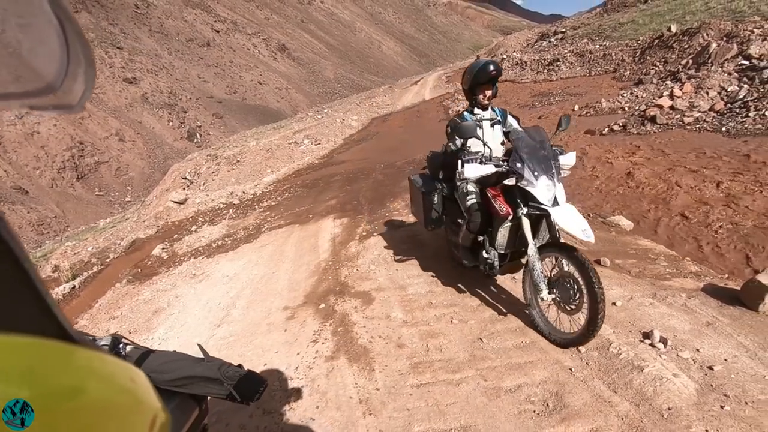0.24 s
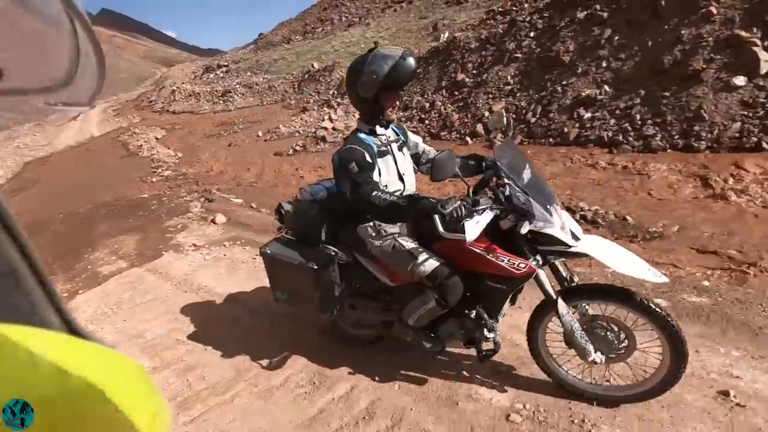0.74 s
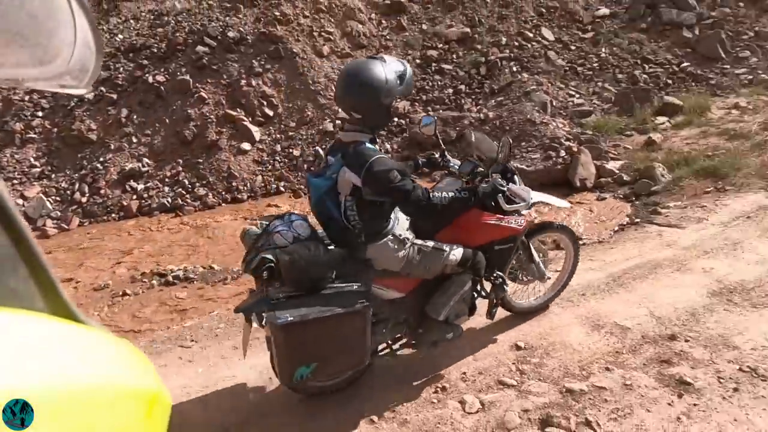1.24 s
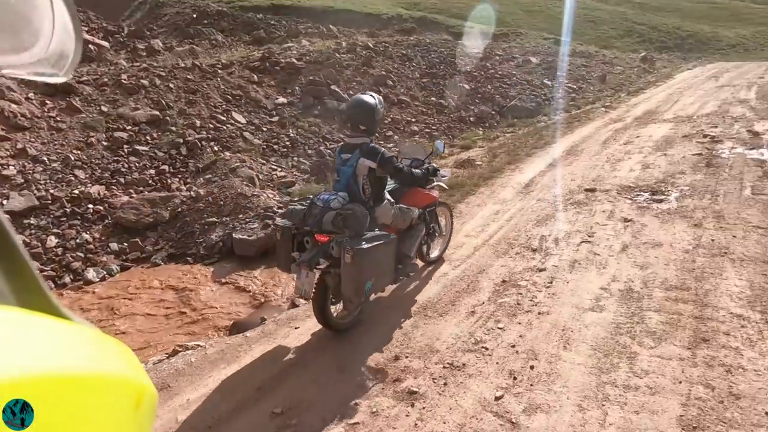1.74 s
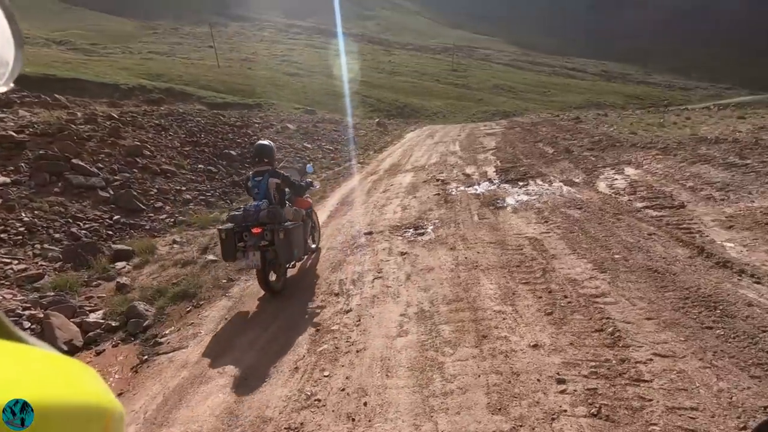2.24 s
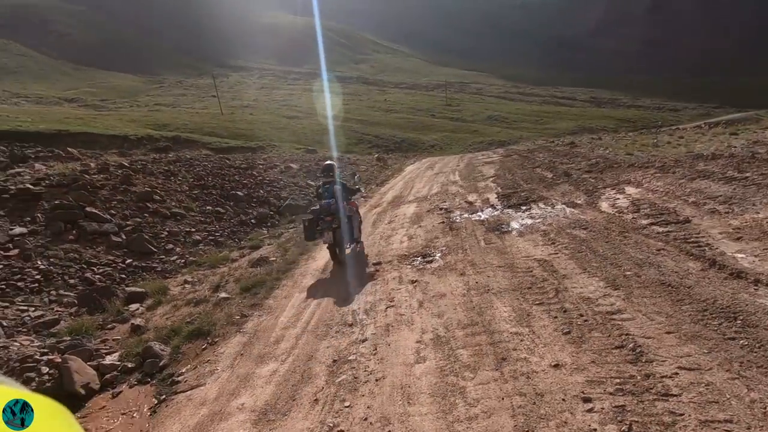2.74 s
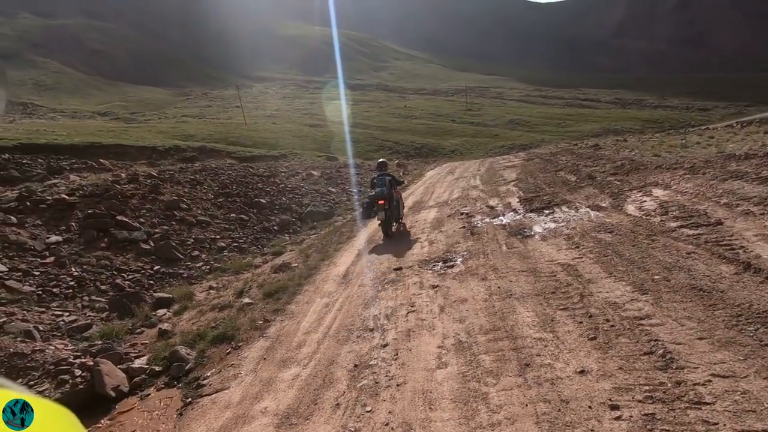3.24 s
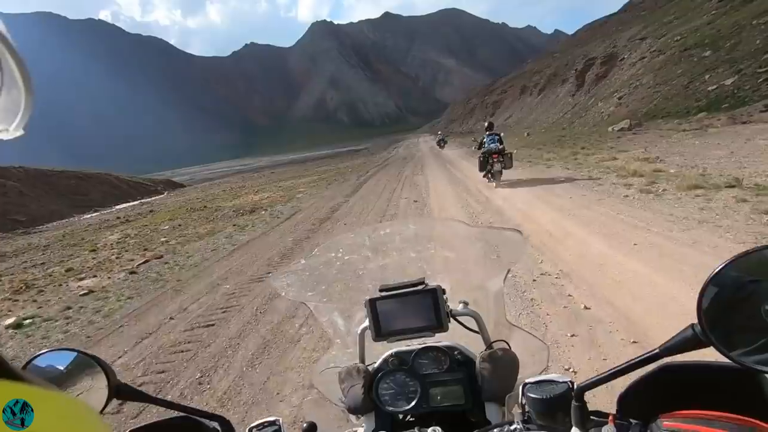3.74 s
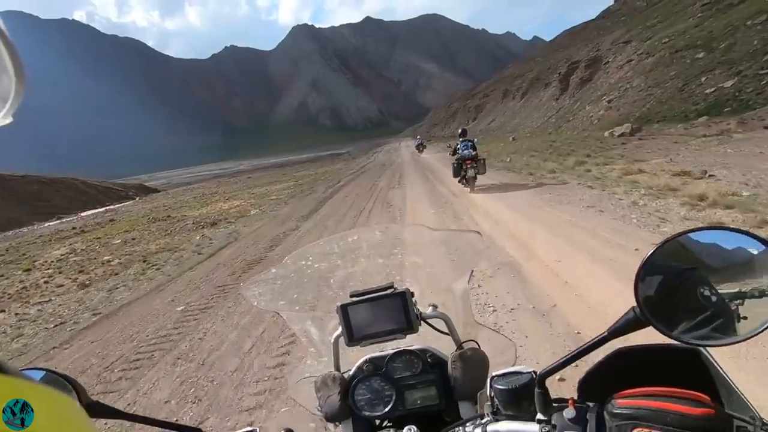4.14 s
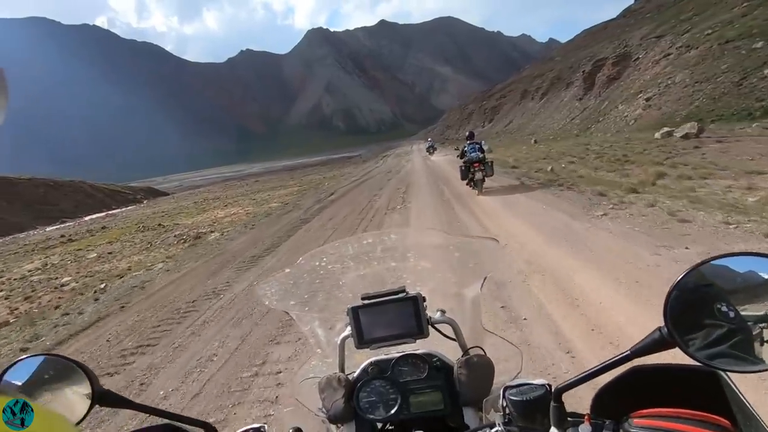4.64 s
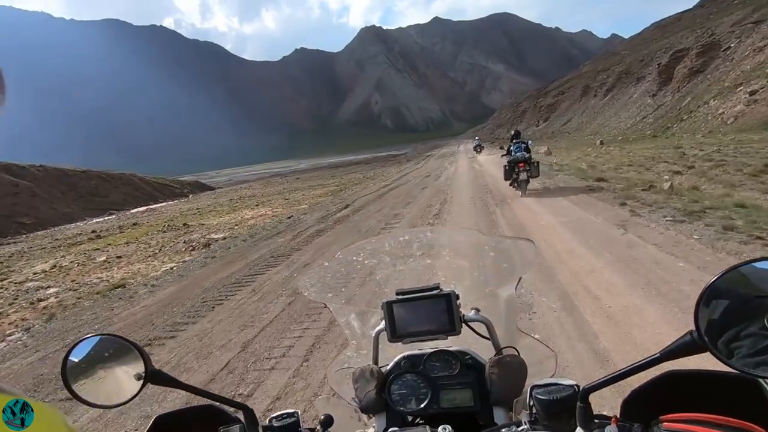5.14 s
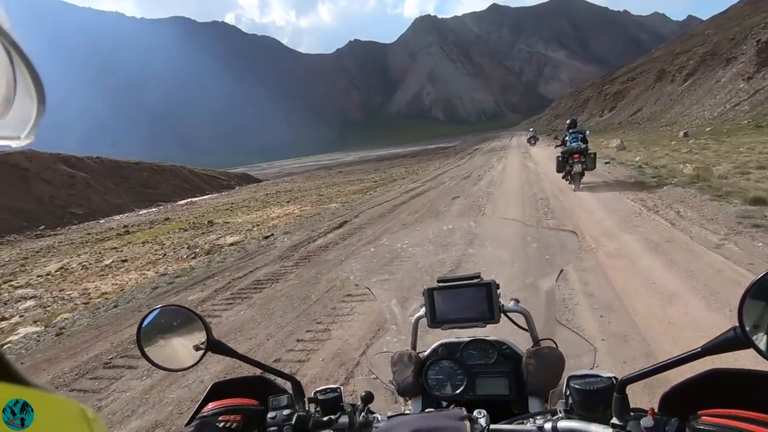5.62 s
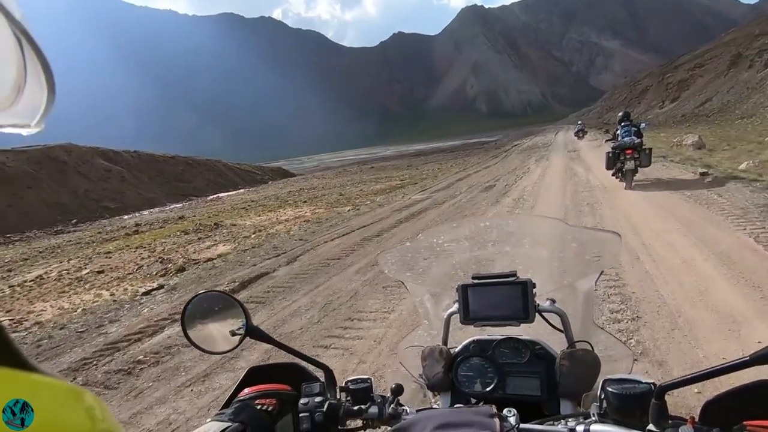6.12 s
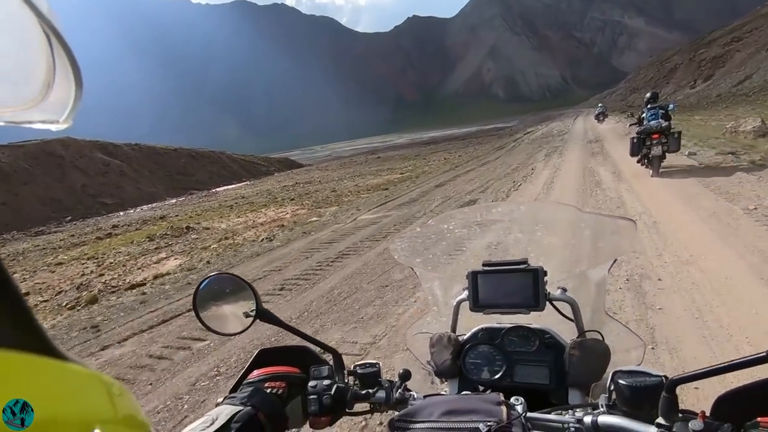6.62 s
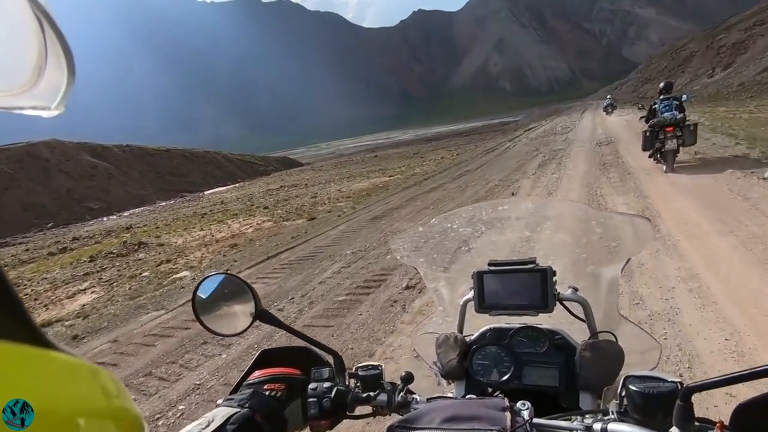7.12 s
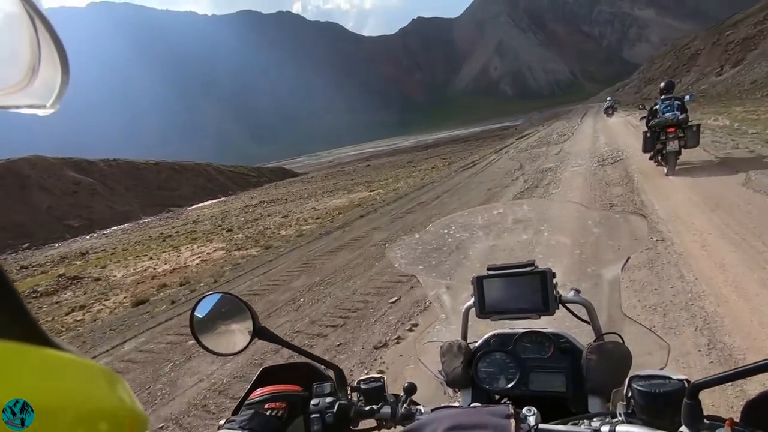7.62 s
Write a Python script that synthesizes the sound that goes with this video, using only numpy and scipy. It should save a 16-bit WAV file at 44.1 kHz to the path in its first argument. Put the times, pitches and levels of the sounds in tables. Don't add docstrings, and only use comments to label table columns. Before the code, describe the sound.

Close helmet-mounted stereo microphone outdoors on a dirt and gravel track, wind buffeting low and unevenly, stronger on the right. From 0 s a single-cylinder motorcycle approaches with separate low thumps, valve ticking and hissing, over a few dull knocks in the first third of a second and near 0.7 s. Fluttering whistly intake gulps around 1.2 kHz are strongest from 0.75 to 1.55 s. It passes closest near 1.85 s, small snaps around 1.65 s, then recedes as revs keep climbing. At 2.81-2.93 s a glove scrapes the housing, gritty and hollow, with a low hum, stopping dead; the sound ducks. Until 3.73 s there is a quiet gap with soft cloth rubs and the engine faintly returning. A hard cut then brings the rider's twin, a steady deep drone rising until about 6.2 s and easing after 7 s, with tyre rumble, chain clatter, luggage ticks, frame knocks and faint screen buzz to about 7.9 s.

```python
import sys
import numpy as np
from scipy import signal
from scipy.fft import rfft, irfft, next_fast_len
from scipy.io import wavfile
from scipy.ndimage import uniform_filter1d, map_coordinates

SR = 44100
rng = np.random.default_rng(int(sys.argv[2]) if len(sys.argv) > 2 else 0)


def linear_from_db(decibels):
    return 10 ** (np.asarray(decibels, float) / 20)


def output_pcm(signal):
    pcm = np.clip(np.atleast_2d(signal).T, -1, 1) * 32767
    wavfile.write(sys.argv[1], SR, np.round(pcm).astype(np.int16))


N = 347067

DUCK_S = 2.93


def clock():
    return np.arange(N) / SR


def unit(x):
    return x / np.sqrt(np.mean(x ** 2) + 1e-20)


def along(points, hz):
    f, v = np.transpose(points)
    return np.interp(np.log(hz + 1), np.log(f + 1), v)


def curves(rows):
    s, *cols = np.transpose(rows)
    return [np.interp(clock(), s, c) for c in cols]


def wobble(rate):
    knots = rng.standard_normal(int(N * rate / SR) + 4)
    return map_coordinates(knots, [np.arange(N) * rate / SR])


def swells(rows, half_s):
    return sum(linear_from_db(db) * np.exp(-((clock() - s) / half_s) ** 2) for s, db in rows)


def filtered(x, response):
    m = next_fast_len(N + SR // 2)
    return irfft(rfft(x, m) * response(np.fft.rfftfreq(m, 1 / SR)), m)[..., :N]


def modes(table):
    def response(f):
        return sum((-1) ** k * linear_from_db(db) * 1j * f * w / (c * c - f * f + 1j * f * w)
                   for k, (c, w, db) in enumerate(table))
    return response


def piped(x, pipe, order=2):
    return unit(filtered(x, lambda f: modes(pipe)(f) ** order))


def rush(spectrum, patchy_db):
    # frequency in Hz, likeness of the two ports (1 is identical).
    alike = [(30, .5), (100, .5), (200, .7), (400, .55), (700, .3), (1200, .6), (1900, .35), (3000, .75),
             (4300, .45), (6500, .42), (9000, .3)]
    z = signal.stft(rng.standard_normal((2, N)), nperseg=512)[2]
    field = uniform_filter1d(rng.standard_normal(z.shape[1:]), 6, 0)
    field = uniform_filter1d(field, 8, 1)
    pair = signal.istft(z * linear_from_db(patchy_db * unit(field)), nperseg=512)[1][:, :N]

    def share(hz):
        turn = np.arccos(np.clip(along(alike, hz), -1, 1)) / 2
        return linear_from_db(along(spectrum, hz)) * [np.cos(turn), np.sin(turn)]
    mid, side = filtered(pair, share)
    return unit(np.array([mid + side, mid - side]))


def rings(rows, damping_db_per_s=0):
    rise_s, t60_s = .005, .12
    out, t = np.zeros(N + SR), np.arange(SR // 8) / SR
    shape = (1 - np.exp(-t / rise_s)) ** 2 * linear_from_db(-60 * t / t60_s)
    shape = shape / shape.max()
    damped_db = damping_db_per_s * np.maximum(t - .008, 0)
    for s, db, hz in rows:
        tone = np.sin(2 * np.pi * (hz * t + rng.random()))
        out[round((s - rise_s) * SR):][:len(t)] += linear_from_db(db - 2 - damped_db) * shape * tone
    return linear_from_db(2.5 * wobble(90)) * out[:N]


def nearness(ahead_s=0):
    closest_s, nearest_m = 1.846, 2.04
    t = clock() - closest_s + ahead_s
    speed = np.where(t < 0, 2.5, 3.6)
    return -10 * np.log10(1 + (speed * t / nearest_m) ** 2)


def moving():
    cut_s, fade_s = 3.7362, .12
    return np.clip((clock() - cut_s) / fade_s + 1, 0, 1)


def firings():
    start_hz, climb_hz_per_s = 16.6, 1.84
    return -13.74 + start_hz * clock() + .5 * climb_hz_per_s * clock() ** 2


def exhaust(turns, scatter_db, jitter_s):
    at = np.flatnonzero(np.diff(np.floor(turns)))
    chance = rng.standard_normal((len(at), 2))
    at = at + np.round(jitter_s * SR * chance[:, 0]).astype(int)
    pulses = np.zeros(N)
    pulses[np.clip(at, 0, N - 1)] = linear_from_db(scatter_db * chance[:, 1])
    return pulses


def single():
    # time in seconds, share of the high note as the revs climb.
    silencer = [(1.3, .05), (2.1, .95)]
    # pitch in Hz, width in Hz, level in dB.
    cold = [(98, 80, 0)]
    revved = [(111, 78, 0)]
    tailpipe = [(275, 80, 0)]
    # time in seconds, level in dB.
    facing = [(.6, -40), (1.0, -21), (1.45, -21), (1.65, -30), (2.2, -26)]
    t = clock()
    cycle = firings() % 1
    duck_db = (t > DUCK_S) * -21.5 * np.exp(-np.abs(t - DUCK_S) / 0.13)
    heard = linear_from_db(duck_db) * (1 - moving())

    pulses = exhaust(firings(), scatter_db=1.5, jitter_s=0.0001)
    pulses = np.roll(pulses, -round(.005 * SR))
    high = np.clip(curves(silencer)[0], 0, 1)
    thump = high * piped(pulses, revved, order=5) + (1 - high) * piped(pulses, cold, order=5)
    thump = thump + linear_from_db(curves(facing)[0]) * piped(pulses, tailpipe, order=4)

    valves = linear_from_db(-60 * cycle / .55) + .7 * linear_from_db(-60 * ((cycle - .24) % 1) / .45)
    tick = piped(valves * rng.standard_normal(N), [(2950, 800, 0), (5800, 2200, -16)])
    tick_db = -65 + 7.8 * np.maximum(nearness(ahead_s=.05), -1.6)
    return heard * (linear_from_db(-29 + nearness()) * thump + linear_from_db(tick_db) * tick)


def intake():
    # time in seconds, peak in dB, pitch in Hz.
    gulps = [(0.2093, -51, 1200), (0.2675, -46, 1193), (0.338, -48, 1164), (0.374, -49, 1112),
             (0.432, -48, 1270), (0.4778, -44, 1178), (0.5342, -41.5, 1180), (0.6061, -40.5, 1144),
             (0.6646, -43, 1120), (0.7026, -49, 1170), (0.7638, -33.5, 1180), (0.8185, -39.5, 1180),
             (0.887, -39, 1160), (0.9671, -44, 1096), (0.9969, -38.5, 1194), (1.0493, -33, 1194),
             (1.104, -35.5, 1205), (1.1595, -35.5, 1240), (1.193, -34.5, 1160), (1.228, -38.5, 1180),
             (1.266, -33.5, 1213), (1.3185, -33.5, 1230), (1.3713, -34.5, 1187), (1.4081, -37.5, 1240),
             (1.472, -47.5, 1135), (1.5288, -34.5, 1187), (1.594, -53, 1124), (1.6225, -42, 1195),
             (1.6889, -50.5, 1276), (1.7453, -47, 1278), (1.7877, -44.5, 1202), (1.837, -44, 1197),
             (1.9041, -50, 1260), (1.9403, -45.5, 1120), (1.9888, -51, 1150), (2.02, -52, 1184),
             (2.0623, -47, 1146)]
    # time in seconds, level in dB.
    low_whistle = [(.25, -44), (.33, -47), (.42, -47), (.49, -43), (.66, -48), (.8, -42.5), (1.12, -41.5),
                   (1.28, -46.5)]
    whistle = piped(rng.standard_normal(N), [(869, 30, 0)])
    return rings(gulps) + linear_from_db(-9.0) * swells(low_whistle, half_s=0.045) * whistle


def whine():
    # time in seconds, level in dB.
    whine_level = [(0, -58), (.5, -53.5), (.8, -47), (.95, -49), (1.2, -44), (1.45, -47), (1.65, -55),
                   (2.1, -61), (2.3, -90.5)]
    return linear_from_db(curves(whine_level)[0]) * piped(rng.standard_normal(N), [(1180, 180, 0)])


def twin():
    # time in seconds, firing rate in Hz, exhaust in dB, boom in dB.
    throttle = [(3.75, 31.4, -33, -3), (4.1, 31.92, -31, -3), (4.45, 32.52, -32, -4), (4.7, 33.2, -40, 0),
                (4.93, 33.47, -37.5, 5.5), (5.2, 33.9, -34.5, 2), (5.45, 34.32, -33, -1.5),
                (5.7, 34.54, -33, -2.5), (5.9, 34.9, -38.5, 7.5), (6.2, 35.18, -35.5, -5.5),
                (6.4, 34.93, -36, 6), (6.7, 35, -38.5, 0), (6.9, 34.99, -37, 0.5), (7.1, 34.6, -42, 7),
                (7.4, 33.4, -41, 0), (7.7, 33.02, -40, 6.5), (7.87, 31.5, -35.5, 7)]
    # pitch in Hz, width in Hz, level in dB; the first one is the boom.
    pipes = [(66, 19, 3), (101, 34, 1.5), (137.3, 36, -13), (210, 26, -3.5), (513, 165, -14.5)]
    rate_hz, level_db, boom_db = curves(throttle)
    turns = np.cumsum(rate_hz * (1 + .004 * wobble(5))) / SR
    pulses = exhaust(turns, scatter_db=1.2, jitter_s=.0003)
    chambers = []
    for pipe in pipes:
        ringing = filtered(pulses, lambda f: modes([pipe])(f) ** 2)
        chambers.append(linear_from_db(1.6 * wobble(8)) * ringing)
    size = np.sqrt(np.mean(chambers[1] ** 2))
    voice = linear_from_db(boom_db) * chambers[0] + sum(chambers[1:])
    return moving() ** 2 * linear_from_db(level_db + 0.5) * voice / size


def glove():
    # time in seconds, level in dB, grit in dB.
    scrape = [(2.808, -75, -21), (2.811, -39, -15), (2.818, -61, 10), (2.841, -55, 6), (2.854, -48.5, 2),
              (2.868, -48.5, 5.5), (2.886, -44.5, 2.5), (2.9, -52, 1), (2.915, -51, -2), (2.922, -40, -11),
              (2.93, -61, -11)]
    # frequency in Hz, level in dB per Hz.
    housing = [(90, -41), (250, -6), (520, -3), (800, -10), (1150, -6.5), (1450, -11.5), (1900, -23),
               (2600, -71.5)]
    grit = [(1300, -53), (1900, -17), (2350, -16.5), (3000, -31), (4600, -38.5), (6800, -40.5),
            (9300, -44.5), (16000, -78.5)]
    sleeve = [(400, -22), (600, -6.5), (900, -9), (1400, 6), (1900, -2.5), (2500, -38)]
    # time in seconds, level of the hum in dB.
    mount = [(2.8, -70), (2.83, -25), (2.9, -27), (2.93, -22), (2.95, -33), (3.0, -27), (3.08, -28),
             (3.16, -36), (3.3, -60)]
    # time in seconds, peak in dB, pitch in Hz.
    knuckles = [(2.852, -36, 1130), (2.883, -36, 1100), (2.89, -38, 1180), (2.919, -35, 1050)]
    level_db, grit_db = curves([(2.8, -110, 0.017)] + scrape + [(2.94, -110, 0.0073)])
    skin = rush(housing, patchy_db=4.0) + linear_from_db(grit_db - 11.5) * rush(grit, patchy_db=-0.5)
    rub = linear_from_db(level_db + 2.0 + 2.0 * wobble(220)) * skin
    puff = linear_from_db(-54) * np.exp(-((clock() - 3.483) / 0.037) ** 4) * rush(sleeve, patchy_db=4.0)
    hum_db = curves([(2.7, -120)] + mount + [(3.4, -120)])[0] + [[-14], [-1.5]]
    hum = linear_from_db(hum_db) * np.cos(2 * np.pi * 38.6 * (clock() - 2.931))
    return rub + puff + hum + rings(knuckles, damping_db_per_s=2209)


def ticks():
    # time in seconds, peak in dB, body in dB.
    luggage = [(3.7347, -58.5, 0.5), (3.759, -72, -2), (3.8172, -73, 2), (3.8711, -65.5, -2),
               (3.915, -59.5, -6), (4.0097, -75, 1), (4.0641, -66, -5), (4.1, -62.5, -5), (4.1499, -61, -3),
               (4.1988, -66.5, 1), (4.3013, -65, -6), (4.3317, -67, -1), (4.356, -64, -7),
               (4.4258, -69, -1), (4.4582, -61, -3), (4.6129, -71, 4), (4.7587, -62, -5), (4.779, -66, -7),
               (4.829, -78, -3), (4.9311, -63.5, 0), (5.0135, -67, 2), (5.065, -75, 5), (5.235, -79, 4),
               (5.3228, -65, -6), (5.3407, -72, -11), (5.428, -66, 4), (5.9029, -70, -2), (6.0795, -63, 1),
               (6.273, -62, -9), (6.3263, -62, 0), (6.398, -67.5, -7), (6.4352, -65, 0), (6.4696, -68, -3),
               (6.525, -65, -6), (6.6233, -76, 0.5), (6.744, -80, 2), (7.0493, -63, -5), (7.0867, -68, -1),
               (7.1463, -64, 0), (7.1995, -67, -3), (7.2484, -68, 1), (7.307, -71, 5), (7.394, -67, 3),
               (7.4823, -66, 4)]
    out, t = np.zeros((2, N + SR)), np.arange(SR // 10) / SR
    bounce = linear_from_db(-60 * t / .016) + (t > .015) * linear_from_db(-5 - 60 * np.abs(t - .015) / .012)
    for s, db, body_db in luggage:
        puff = bounce * rng.standard_normal(len(t))
        out[:, round(s * SR):][:, :len(t)] += puff * linear_from_db([[db + 8.5], [db + body_db + 14]])
    bright = filtered(out[0, :N], lambda f: modes([(6600, 2300, 0)])(f) ** 3)
    return bright + filtered(out[1, :N], lambda f: modes([(2900, 1500, 0)])(f) ** 2)


def knocks():
    # time in seconds, peak in dB, pitch in Hz.
    frame_hits = [(0.126, -45, 185), (0.256, -22.5, 240), (0.329, -27.5, 209), (0.263, -20.5, 78.4),
                  (0.325, -22.5, 65.6), (0.689, -26, 75.2), (2.921, -25, 263), (0.665, -37.5, 242),
                  (2.135, -27.5, 195), (2.811, -27.5, 242), (3.839, -36, 230), (4.156, -28.5, 207),
                  (4.951, -27.5, 200), (5.039, -24, 206), (5.087, -24.5, 207), (5.231, -23, 326),
                  (5.484, -25.5, 200), (6.292, -29, 219), (6.344, -44.5, 199), (6.632, -37, 220),
                  (6.933, -37, 216), (7.453, -29, 219), (7.76, -31, 285)]
    out, t = np.zeros(N + SR), np.arange(SR // 10) / SR
    for s, db, hz in frame_hits:
        thud = np.sin(2 * np.pi * hz * t) + .5 * np.sin(2 * np.pi * 1.614 * hz * t)
        out[round(s * SR):][:len(t)] += linear_from_db(db + 2.5 - 60 * t * hz / 9) * (1 - np.exp(-t / .002)) * thud
    return out[:N]


def snaps():
    # time in seconds, peak in dB, centre in Hz, width in Hz.
    sharp_edges = [(1.644, -44, 3000, 700), (1.655, -45, 3000, 700), (1.696, -50, 3100, 900),
                   (2.7046, -62, 4500, 4000), (2.7525, -66, 5500, 5000), (2.8112, -43, 2400, 2600),
                   (2.8232, -46, 8200, 4400), (2.8236, -47, 3500, 1000)]
    out, t = np.zeros(N + SR), np.arange(SR // 10) / SR
    for s, db, hz, width in sharp_edges:
        band = signal.butter(3, [hz - width / 2, hz + width / 2], "band", fs=SR)
        edge = signal.lfilter(*band, linear_from_db(-60 * t / .004) * rng.standard_normal(len(t)))
        out[round(s * SR):][:len(t)] += linear_from_db(db) * edge / np.abs(edge).max()
    return out[:N]


def cloth_rubs():
    # time in seconds, half length in seconds, drag in dB, rub in dB.
    rubs = [(3.015, 0.064, -1.5, 8.5), (3.193, 0.085, -2.5, 8), (3.326, 0.072, -2, 8.5),
            (3.492, 0.059, 1.5, 5), (3.727, 0.024, -0.5, 10.5)]
    strokes = [np.array(db)[:, None] * np.exp(-((clock() - s) / half_s) ** 4) for s, half_s, *db in rubs]
    return sum(strokes)


def cloth():
    # frequency in Hz, level in dB per Hz.
    rustle = [(940, -42), (1600, -6.5), (2050, 2.5), (2600, -10.5), (3000, -15), (3400, -10), (4240, -32),
              (7170, -120)]
    drag_db, rub_db = cloth_rubs()
    level = (clock() > DUCK_S) * (1 - moving()) * linear_from_db(-72.5 + 1.4 * rub_db)
    return level * rush(rustle, patchy_db=1.2)


def chug():
    swell = np.cos(2 * np.pi * (firings() - 0.98))
    return 1.5 * (clock() < DUCK_S) * linear_from_db(nearness() / 2) * swell


def running_levels():
    # time in seconds, how hard the ground shakes things in dB over the usual.
    jolt = [(0, 1), (.13, 3), (.5, 2), (.95, 2), (1.45, -1), (2.23, -1.5), (2.7, 1), (2.8, 2), (3.0, -1.5),
            (3.75, 2.5), (3.9, -1.5), (4.5, 2), (5.08, 5), (5.25, 0.5), (6.17, -1), (6.39, 3.5), (6.7, 1.5),
            (7.25, 2)]
    still_db = (-53.5, -60.5, -71, -77.5)
    ducked_db = (-54.5, -66.5, -78, -87.5)
    moving_db = (-50, -62, -75, -84.5)
    per_jolt = (1, 0.62, .9, .5)
    per_near = (0.036, 0.59, 0.99, 0.43)
    per_drag = (0.63, 0.93, 0.2, 0.22)
    per_rub = (0.072, 0.098, 0.73, 0.33)

    def column(v):
        return np.array(v)[:, None]
    t, riding = clock(), moving()
    drag_db, rub_db = cloth_rubs()
    passing_db = column(still_db) + column(per_near) * (nearness() + 3)
    standing_db = np.where(t < DUCK_S, passing_db, column(ducked_db))
    level_db = (1 - riding) * standing_db + riding * column(moving_db)
    level_db = level_db + column(per_jolt) * curves(jolt)[0]
    level_db = level_db + column(per_rub) * rub_db + column(per_drag) * drag_db
    rumble_db, drone_db, clatter_db, hiss_db = level_db
    hiss_db = hiss_db - 1.1 * (t < DUCK_S) * (t - DUCK_S / 2)
    clatter_db = clatter_db + np.roll(chug(), round(.01 * SR))
    return rumble_db, drone_db + chug(), clatter_db, hiss_db


def running():
    # frequency in Hz, level in dB per Hz.
    standing = [(100, -17.5), (170, 1), (495, -16), (560, -15.5), (621, -16.5), (800, -30), (1040, -40),
                (1760, -120)]
    riding_rumble = [(76, -32.5), (130, -3.5), (210, -4), (410, -14.5), (555, -14.5), (800, -28),
                     (1040, -62.5), (1760, -120)]
    body_drone = [(450, -11.5), (750, -8), (920, -4.5), (1170, 0), (1400, -8), (1700, -14), (1950, -11),
                  (2300, -23.5), (2900, -63.5)]
    chain_clatter = [(1800, -3.5), (2400, -0.5), (2900, 2.5), (3400, -6), (4200, -16), (5200, -22.5),
                     (7000, -72)]
    air_hiss = [(3000, -25.5), (4200, -12), (5300, -9), (6500, -1), (7200, -9), (8200, -18.5),
                (9500, -27.5), (12000, -53.5)]
    riding, shake = moving(), wobble(18)
    rumble_db, drone_db, clatter_db, hiss_db = running_levels()
    near = rush(standing, patchy_db=2.5)
    near = near + 0.2 * (near.mean(axis=0) - near)
    road = (1 - riding) * linear_from_db(-.5) * near + riding * rush(riding_rumble, patchy_db=1.0)
    body = rush(body_drone, patchy_db=0.5)
    body = body + (1 - riding) * 0.2 * (body.mean(axis=0) - body)
    rumble = linear_from_db(rumble_db + 7.0 + 0.9 * shake + 0.98 * wobble(40)) * road
    drone = linear_from_db(drone_db + 11.0 + 0.48 * shake + 1.5 * wobble(60)) * body
    clatter = linear_from_db(clatter_db + 4.5 + 0.59 * shake + 1.7 * wobble(60)) * rush(chain_clatter, patchy_db=1.0)
    hiss = linear_from_db(hiss_db + 1.0 + 0.4 * shake + 1.5 * wobble(70)) * rush(air_hiss, patchy_db=1.5)
    return rumble + drone + clatter + hiss


def screen_buzz():
    # pitch in Hz, width in Hz, level in dB.
    screen = [(916, 76, 0)]
    # time in seconds, level in dB.
    buzz_at = [(6.1, -57), (7.0, -63.5)]
    return swells(buzz_at, half_s=0.55) * piped(rng.standard_normal(N), screen)


def cooling_fins():
    # pitch in Hz, width in Hz, level in dB.
    fins = [(1910, 260, 0)]
    return (clock() < DUCK_S) * linear_from_db(-60.5 + chug()) * piped(rng.standard_normal((2, N)), fins)


def wind():
    # time in seconds, buffeting in dB.
    buffets = [(0.0, -34), (0.42, -35), (0.46, -38.5), (0.61, -36), (1.58, -45.5), (2.8, -40.5),
               (2.83, -46.5), (3.42, -40), (3.46, -38), (3.6, -42.5), (3.72, -37), (4.47, -42),
               (4.54, -33.5), (5.46, -38.5), (7.34, -34.5), (7.36, -36), (7.72, -35.5), (7.87, -35.5)]
    # frequency in Hz, level in dB per Hz.
    gusts = [(9, -31), (18, -16), (40, 3), (60, -3.5), (85, -2.5), (130, -10), (200, -41.5), (400, -97.5)]
    level_db, = curves(buffets)
    lean_db = -8 - 0.1 * (level_db - level_db.mean()) + 3.5 * wobble(8.3)
    port_db = level_db + 6.0 + np.outer([.5, -.5], lean_db + 7.0)
    lumps = linear_from_db(1.46 * np.array([wobble(8.4), wobble(14)]))
    return linear_from_db(port_db) * unit(lumps * rush(gusts, patchy_db=-1.0))


def scene():
    passing_bike = single() + intake() + whine() + cooling_fins()
    own_bike = twin() + screen_buzz()
    rattles = ticks() + knocks() + snaps()
    return passing_bike + own_bike + glove() + cloth() + rattles + running() + wind()


def low_pass(x):
    return signal.sosfilt(signal.butter(12, 15800, fs=SR, output="sos"), x)


def record(dry):
    # frequency in Hz, radians by which the left port leads.
    lead = [(0, 0), (300, .3), (600, .3), (850, -.2), (1030, -.7), (1500, -1.4), (1900, -3.3), (2400, -3.8),
            (3600, -4.4), (4300, -5.3), (6500, -7.3)]
    # frequency in Hz, left minus right in dB.
    tilt = [(60, -4), (140, -2.5), (330, -6), (600, -3.5), (1200, -3.2), (2000, -3), (3000, -6), (5000, -9),
            (6500, -11.5), (8000, -6.5), (12000, -8)]
    # frequency in Hz, level of the preamplifier hiss in dB per Hz.
    self_noise = [(4000, -35), (7500, 0), (9000, -1), (12000, -9.5), (15600, -11.5), (16500, -49)]
    # time in seconds, dB a step.
    stairs = [(2.8, .06), (2.84, .3), (2.87, .08), (2.96, .2), (3.0, .7), (3.04, .6), (3.11, .06)]
    # time in seconds, jump in dB.
    splices = [(3.7232, -52), (3.7362, -36)]
    half = np.array([[.5], [-.5]])

    def port(hz):
        return linear_from_db(half * along(tilt, hz) - 1.07) * np.exp(1j * half * along(lead, hz))
    ports = filtered(np.pad(dry, ((0, 0), (0, SR // 20)), "reflect"), port)
    hiss = filtered(rng.standard_normal((2, N)), lambda hz: linear_from_db(along(self_noise, hz)))
    ports = ports + linear_from_db(-107) * unit(hiss)

    saw = .5 - (clock() - 2.9298) / (256 / 48000) % 1
    stepped = ports * linear_from_db(curves(stairs)[0] * saw)
    for s, db in splices:
        stepped = stepped + linear_from_db(db) * (clock() >= s) * np.exp(-np.abs(clock() - s) / .004)
    rounded = stepped / (1 + np.abs(stepped / .17) ** 4) ** (1 / 4)
    return low_pass(rounded)


dry = scene()
out = record(dry)
output_pcm(out)
```